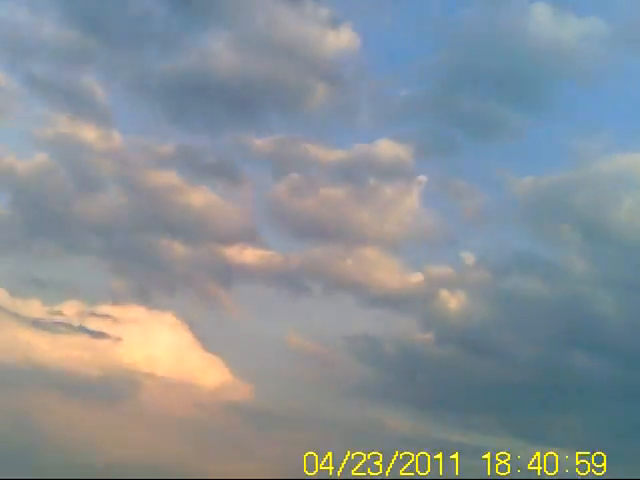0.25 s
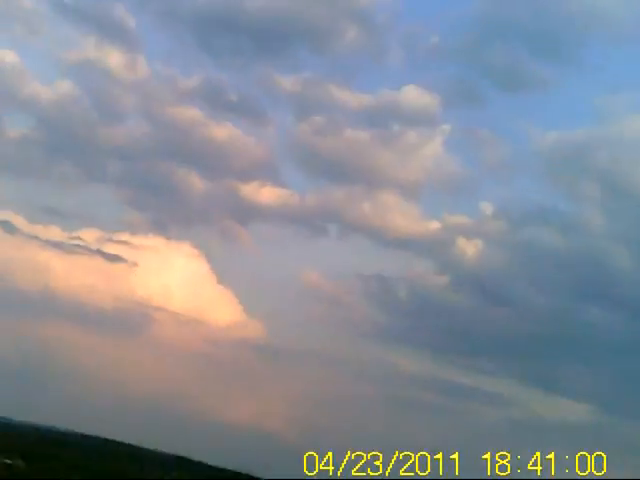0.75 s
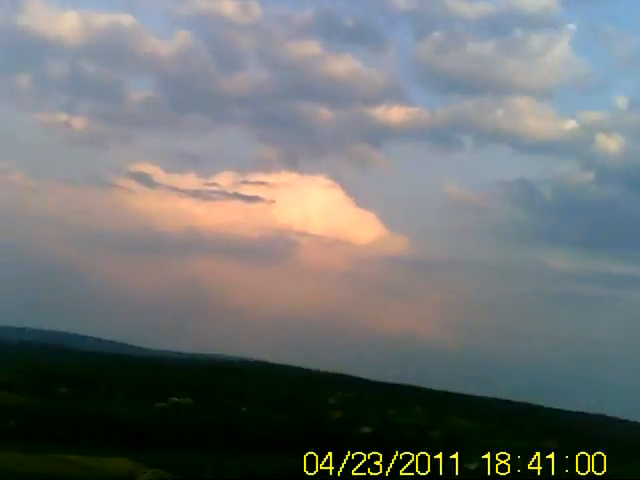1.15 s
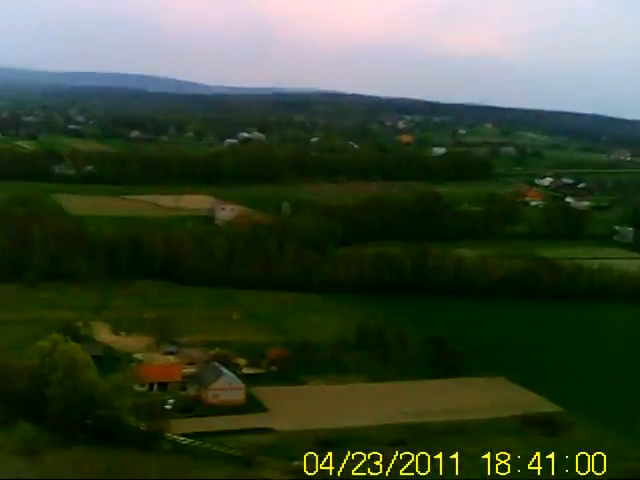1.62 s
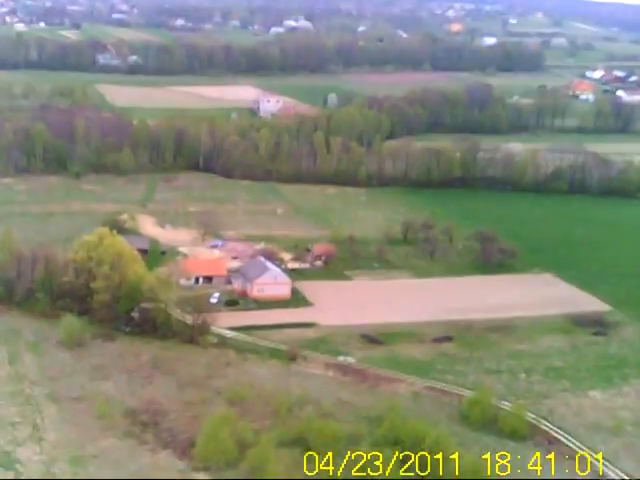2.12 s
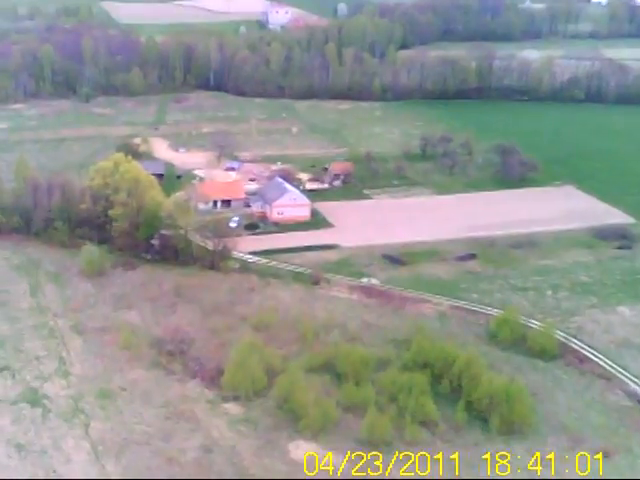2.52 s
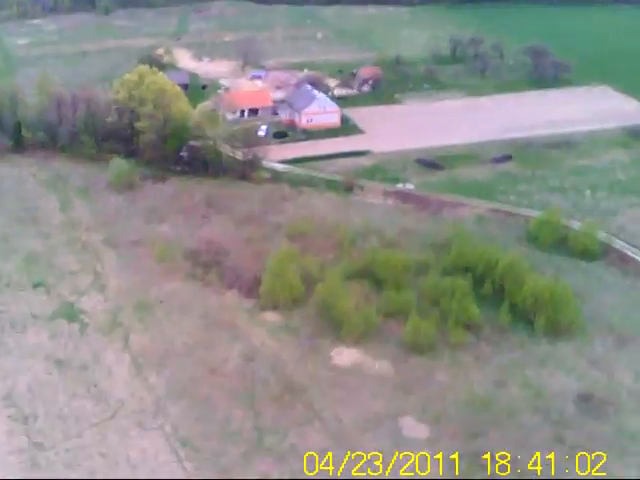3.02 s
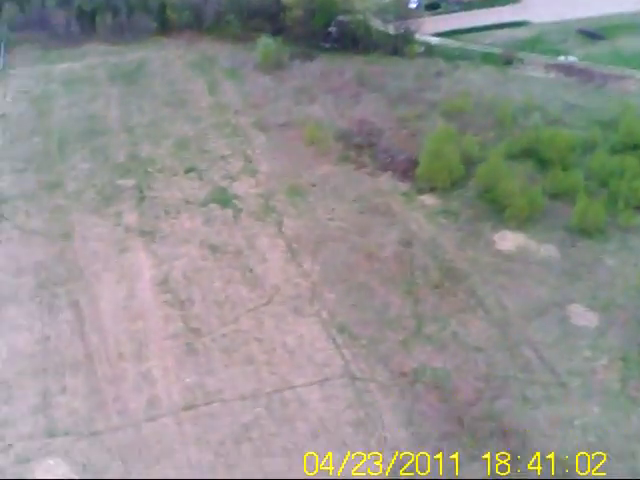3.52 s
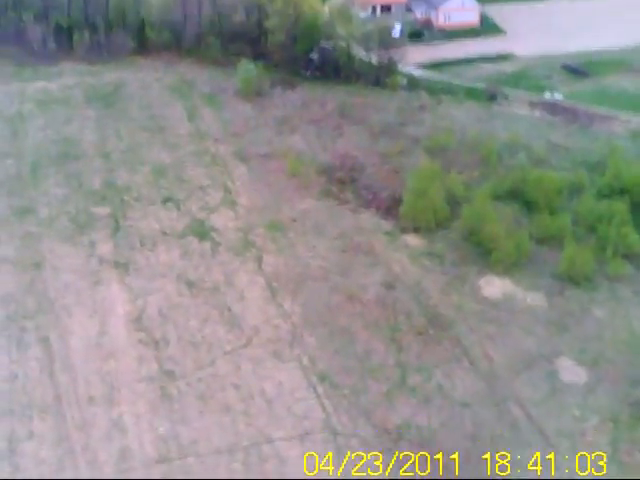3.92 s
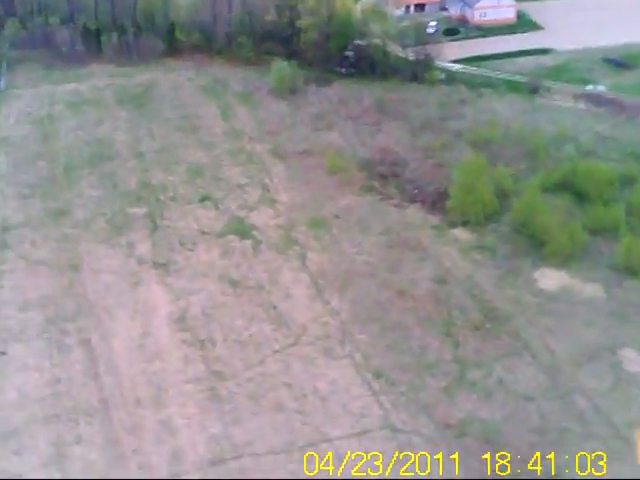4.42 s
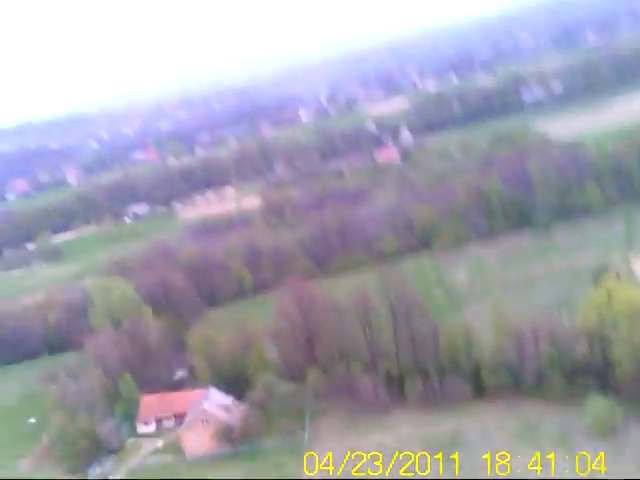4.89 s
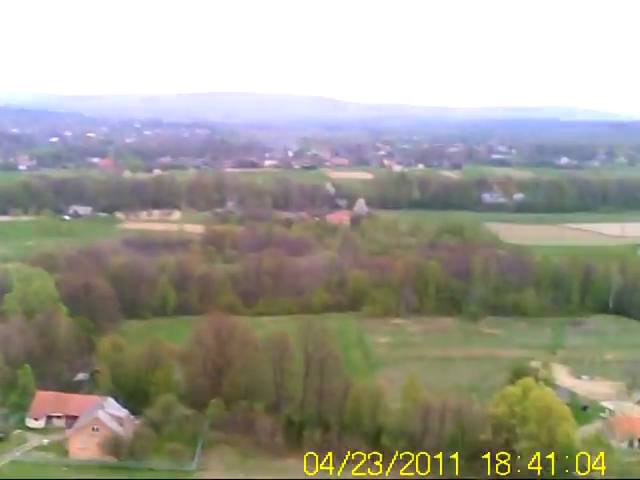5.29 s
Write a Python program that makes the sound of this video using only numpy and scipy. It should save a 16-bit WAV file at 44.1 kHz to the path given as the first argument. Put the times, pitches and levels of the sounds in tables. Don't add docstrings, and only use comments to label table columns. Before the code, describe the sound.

Open-air flight heard from a bare microphone fixed to a small electric model plane, close, dry and slightly overloaded. From 0 to 1.1 s a thin, buzzy motor whine with a fine sizzle runs beneath low wind thumps, fluttering rumble and hiss. A wavering, breathy high whistle rides on the airflow. At about 1.2 s the power is cut; the motor's tone slides downward as a rough whirr, fading out around 2 s, while a faint electronic tone beeps briefly and then lingers. Near 2.3 s the wind and whistle weaken, and tiny servo rasps tick at 2.4-2.6 s and again at 3.1 s. From 3.2 to 3.9 s strong gusts bring knocks, flutter and bright torn hiss. More buffeting follows at 4.35-4.8 s with hard jolts and a sharper whistle. Around 4.9 s the low rumble drops while hiss stays strong, then everything eases, motor still silent, to 5.5 s.

```python
import sys
import numpy as np
from scipy import signal
from scipy.fft import rfft, irfft, next_fast_len
from scipy.io import wavfile
from scipy.ndimage import uniform_filter1d

SR = 44100
rng = np.random.default_rng(int(sys.argv[2]) if len(sys.argv) > 2 else 0)


def store_wav(level_fs):
    pcm = np.round(np.clip(np.atleast_2d(level_fs), -1, 1) * 32767)
    wavfile.write(sys.argv[1], SR, pcm.T.astype(np.int16))


def convert_level_to_amplitude(level_db):
    exponent = np.asarray(level_db, float) / 20
    return 10 ** exponent


N = 244755
TIME = np.arange(N) / SR
COARSE = TIME[::64]
SIZE = next_fast_len(N)
RUN_HZ = 136

# centre_s, extra_speed_share
KICKS = [(2.02, .04), (2.125, .035), (3.362, .05), (3.38, .05), (3.45, .05), (3.668, .05), (3.69, .05),
         (3.892, .07), (4.37, .035), (4.402, .06), (4.474, .1), (4.497, .07), (4.693, .03), (4.705, -.025),
         (4.73, .03), (4.748, -.025), (4.762, .04), (5.195, .02), (5.226, .06)]


def curves(table):
    s, *columns = np.transpose(table)
    return [np.interp(TIME, s, column) for column in columns]


def after(s):
    return np.maximum(TIME - s, 0)


def swells(s, length, sizes, edge):
    distance = np.abs(COARSE - s[:, None]) / (np.abs(length[:, None]) / 2)
    shape = np.exp(-distance ** edge)
    return [np.interp(TIME, COARSE, size @ shape) for size in sizes]


def walk(rate):
    hold = int(SR / np.clip(rate, 1, 300))
    levels = np.repeat(rng.standard_normal(N // hold + 1), hold)
    return 1.3 * uniform_filter1d(uniform_filter1d(levels, hold), hold)[:N]


def band_noise(order, low_hz, high_hz):
    band = signal.butter(order, (low_hz, high_hz), "band", fs=SR, output="sos")
    return signal.sosfilt(band, rng.standard_normal(N))


def coloured(colour):
    hz, db = np.transpose(colour)
    octave = np.log2(np.maximum(np.fft.rfftfreq(SIZE, 1 / SR), 1))
    level_db = np.interp(octave, np.log2(hz), db, -200, -200)
    return rfft(rng.standard_normal(SIZE)) * convert_level_to_amplitude(level_db), octave


def turbulence(colour, shared, shared_db, own_db, rate):
    noise, octave = coloured(colour)
    lowest, highest = np.log2(colour[1][0]), np.log2(colour[-2][0])
    out = 0
    for centre in np.arange(lowest - .5, highest + 1, .5):
        window = np.cos(np.pi / 2 * np.clip(2 * (octave - centre), -1, 1)) ** 2
        out = out + irfft(window * noise, SIZE)[:N] * convert_level_to_amplitude(own_db * walk(rate))
    out = out * convert_level_to_amplitude(shared_db * shared)
    return out / out.std()


def shaft():
    ease_s, cut_s, ease_share = 1.12, 1.197, .3
    coast = ease_share * after(ease_s) + (1 - ease_share) * after(cut_s) + 1.8 * after(1.59) ** 2
    hz = 1 / (1 / RUN_HZ + .0198 * coast)
    drive_db = np.maximum(-2600 * after(1.15) ** 2, -75)
    fade_db = .5 * np.maximum(49 - hz, 0) + 3 * np.maximum(37 - hz, 0)
    cog_db = -41.8 - 13 * convert_level_to_amplitude(drive_db) - fade_db
    return hz, drive_db, cog_db


def motor():
    # shaft_multiple, level_db
    drive_partials = [(9, -59.5), (11, -50), (12, -63), (15, -53), (18, -56), (21, -56), (28, -58),
                      (29, -62), (31, -65), (32, -63), (42, -53.5), (43, -78)]
    # shaft_multiple, level_db
    cog_partials = [(11, -11), (13, 0), (25, -10), (39, -6.5)]
    # frequency_hz, gain_db
    frame_response = [(520, -30), (615, -8), (670, 2), (790, 5.5), (880, -1), (1010, -3), (1230, 4.5),
                      (1540, -6), (2150, 2), (3000, -16)]
    shaft_hz, drive_db, cog_db = shaft()
    turns = 2 * np.pi * np.cumsum(shaft_hz * (1 + .0017 * walk(14))) / SR

    def partial(k, db, rough=0):
        phase = k * turns + 7 * rng.random() + rough * walk(150)
        return np.sin(phase) * convert_level_to_amplitude(db + 1.0 + .9 * walk(25))

    frame_hz, frame_db = np.transpose(frame_response)
    cogging = 0
    for k, db in cog_partials:
        gain_db = np.interp(np.log(k * shaft_hz), np.log(frame_hz), frame_db)
        slow_db = (k > 13) * 1.6 * np.maximum(46 - shaft_hz, 0)
        cogging = cogging + partial(k, db + gain_db - slow_db, rough=abs(k - 13) / 22)
    cogging = cogging * (1 + .3 * np.cos(turns)) * convert_level_to_amplitude(.9 * walk(90))
    drive = sum(partial(k, db + drive_db * max(k - 14, 0) / 2.5) for k, db in drive_partials)
    switching = convert_level_to_amplitude(-74 + 3.5 * walk(70)) * band_noise(8, 9900, 11900)
    return convert_level_to_amplitude(drive_db) * (drive + switching) + convert_level_to_amplitude(cog_db) * cogging


def electronics():
    # pitch_hz, level_db, start_s, end_s
    tones = [
        (5416, -80, 0, 6),
        (7154, -80, 0, 6),
        (9281, -92, 0, 6),
        (7725, -68.5, 1.13, 1.29),
        (7725, -69.5, 1.47, 2.1),
        (11073, -90, 0, 1.17),
    ]
    out = 0
    for hz, db, start, end in tones:
        gate = np.clip(np.minimum(TIME - start, end - TIME) / .025, 0, 1)
        out = out + convert_level_to_amplitude(db + 2.5) * np.sin(2 * np.pi * hz * TIME) * gate
    return out


def eddies():
    # time_s, level_db
    shaking = [(0.0, -25), (.9, -27), (1.25, -25.5), (1.33, -28), (1.55, -29), (1.87, -27), (2.35, -33),
               (2.6, -29.5), (3.15, -29), (3.26, -29.5), (3.36, -27), (3.9, -26), (3.96, -28), (4.75, -28),
               (4.82, -36.5), (4.96, -36.5), (5.07, -30), (5.55, -31.5)]
    # centre_s, length_s, level_db, fineness (0 thump, 1 flutter, 2 rumble)
    passing_eddies = [(0.0, .08, -17.5, -8), (0.359, 0.093, -21.5, -0.5), (0.566, 0.039, -22.5, 0.2),
                      (0.88, 0.059, -42.5, -3.5), (1.145, 0.024, -25, 0.8), (1.21, 0.14, -31.5, 0.5),
                      (1.391, 0.046, -21, -0.5), (1.916, 0.19, -20, -0.18), (2.186, 0.16, -23, -0.76),
                      (2.575, 0.074, -25, 1.5), (2.773, 0.9, -29, 0.7), (3.062, 0.097, -31.5, 1),
                      (3.168, 0.11, -31, 1.5), (3.32, 0.065, -27.5, 1.5), (3.422, 0.045, -20, 0),
                      (3.477, 0.16, -22, 0.5), (3.403, 0.04, -29.5, 1.5), (3.679, 0.021, -9, 1.5),
                      (3.777, 0.015, -33.5, -3.5), (3.879, 0.049, -23, 1.5), (3.715, 0.08, -26, 0.5),
                      (3.815, 0.16, -21, 0.77), (4.339, .06, -13, -1.5), (4.377, 0.15, -24, 0.8),
                      (4.497, 0.081, -19.5, 0.1), (4.688, 0.041, -29, -4), (4.623, 0.021, -32.5, 1.5),
                      (4.733, 0.014, -29.5, 2.5), (4.766, 0.02, -27, 1), (5.051, 0.17, -50, 4),
                      (5.225, 0.19, -26.5, 0.5)]
    bed_levels = (-2.5, 0, 0.62, -12.5)
    bed_growth = (0.99, 0.91, 0.93, 1.13)
    bed_db = curves(shaking)[0] + 30
    beds = [base - 30 + growth * bed_db for base, growth in zip(bed_levels, bed_growth)]
    beds[3] = beds[3] + 0.9 * airstream()[4]
    s, length, db, fineness = np.transpose(passing_eddies)
    sizes = [convert_level_to_amplitude(db - 22 * (fineness - k) ** 2) for k in range(4)]
    passing = swells(s, length, sizes, 2)
    return [20 * np.log10(convert_level_to_amplitude(bed) + p) for bed, p in zip(beds, passing)]


def trains():
    # centre_s, length_s, pitch_hz, level_db
    runs = [
        (0.26, 0.053, 86.5, -15),
        (0.492, 0.1, 91.4, -14),
        (3.318, 0.049, 92.4, -14.5),
        (3.371, 0.065, 93.7, -14.5),
        (3.474, 0.046, 82.4, -13.5),
        (3.535, .09, 94.3, -17),
        (4.387, 0.093, 77.2, -14.5),
        (4.49, 0.071, 83.9, -15),
        (5.03, 0.058, 161, -26.5),
        (4.965, 0.056, 167, -29),
    ]
    out = 0
    for s, length, hz, db in runs:
        envelope = np.exp(-((TIME - s) / (length / 2)) ** 2)
        out = out + convert_level_to_amplitude(db) * np.cos(2 * np.pi * hz * (TIME - s)) * envelope
    return out


def lurches():
    # centre_s, pressure, width_s
    pushes = [(0.0, 0.17, 0.014), (0.576, 0.6, 0.0025), (0.873, 0.25, 0.00072), (1.025, 0.44, 0.0032),
              (1.072, 0.38, 0.0031), (1.371, 0.2, 0.012), (1.413, -0.082, 0.0036), (2.04, -0.29, 0.017),
              (3.184, 0.33, 0.0015), (3.19, 0.14, 0.021), (3.2088, -0.75, 0.00069), (3.277, 0.26, 0.0032),
              (3.445, 0.11, 0.005), (3.561, -0.19, 0.018), (3.66, 0.34, .014), (3.688, 0.62, 0.0028),
              (3.782, .28, 0.011), (3.826, -.15, 0.0084), (3.89, 0.55, 0.0018), (4.354, 0.21, 0.0038),
              (4.52, -0.19, 0.026), (4.67, 0.41, 0.0014), (4.688, 0.27, 0.0053), (4.73, 0.25, 0.0027),
              (4.754, 0.4, 0.0017), (5.185, -0.21, 0.012)]
    # start_s, pressure, recovery_s
    drops = [
        (3.207, 0.24, 0.015),
        (3.69, 0.23, 0.022),
        (3.895, 0.52, 0.027),
        (4.695, .3, 0.0052),
        (4.775, 0.49, 0.079),
    ]
    push = sum(size * np.exp(-.5 * ((TIME - s) / width) ** 2) for s, size, width in pushes)
    drop = sum(size * np.exp(-after(s) / back) * np.tanh(after(s) / 0.00098) for s, size, back in drops)
    leaked = signal.sosfilt(signal.butter(1, 2.9, "high", fs=SR, output="sos"), push - drop)
    return signal.sosfiltfilt(signal.butter(4, 800, fs=SR, output="sos"), leaked)


def buffeting(flutter, gust):
    # frequency_hz, level_db
    thump_colour = [(2.9, -43), (5.0, -2.5), (16, -3), (38, 0), (55, -10), (72, -39), (120, -120)]
    rumble_colour = [(71, -13), (120, 1.5), (340, -8.5), (440, -61), (750, -120)]
    rush_colour = [(200, -32), (340, -1), (624, -12.5), (771, -18.5), (900, -28), (1170, -54), (1980, -120)]
    thump_db, flutter_db, rumble_db, rush_db = eddies()
    swell = walk(15)
    thump = turbulence(thump_colour, swell, shared_db=2.5, own_db=1.8, rate=5.3)
    rumble = turbulence(rumble_colour, swell, shared_db=0.53, own_db=2.0, rate=16)
    rush = turbulence(rush_colour, swell + gust, shared_db=0.14, own_db=1.56, rate=18)
    out = convert_level_to_amplitude(thump_db + 0.5) * thump + convert_level_to_amplitude(flutter_db - 0.3) * flutter
    out = out + convert_level_to_amplitude(rumble_db - 0.1) * rumble + convert_level_to_amplitude(rush_db + 1.0) * rush
    return out + lurches() + trains()


def airstream():
    # time_s, shedding_hz, hiss_db, tone_lock_db
    air = [(0.0, 2440, -40, -52.5), (1.05, 2380, -39.5, -53.5), (1.34, 2311, -42, -53),
           (1.64, 2040, -41, -58.5), (2.08, 1980, -45, -53.5), (2.29, 1800, -49, -77),
           (2.5, 1840, -47, -71.5), (2.58, 1900, -44.5, -51.5), (2.82, 1879, -46, -57.5),
           (2.97, 1830, -46, -87), (3.33, 2020, -43.5, -51), (3.95, 1990, -44, -52), (4.25, 1990, -46, -54),
           (4.63, 2100, -43.5, -54), (4.9, 2110, -46, -55), (5.24, 2090, -45.5, -56.5),
           (5.38, 1835, -47.5, -67), (5.55, 1800, -49.5, -77)]
    # centre_s, length_s, extra_speed_share, extra_hiss_db, upper_tone_push_db
    gusts = [(0.02, .1, 0.065, 1, 0), (0.297, 0.038, 0.017, -1, -2), (0.485, 0.078, 0.039, 1.4, 0),
             (0.588, 0.038, 0.023, 1.5, 1), (0.676, 0.068, -0.015, -0.2, -1), (0.833, .09, -0.028, -0.5, 1),
             (1.008, 0.09, -0.02, -1.2, 3), (1.237, 0.14, 0.051, 0.5, 6), (1.379, 0.046, 0.065, 3.5, 7),
             (1.434, .06, 0.021, 1, 5), (1.596, .07, .04, 0, -3), (1.487, 0.19, 0.027, 3, 1),
             (1.64, 0.069, -0.009, -2.5, 8), (1.835, 0.19, 0.039, -1.5, 4.5), (2.004, 0.058, 0.075, 2, 1),
             (2.431, 0.097, 0.046, -0.5, 4.5), (2.185, 0.034, 0.035, -1, 5.5), (2.866, 0.076, .01, -1, 3.5),
             (3.074, 0.061, 0.002, 1.5, 5), (3.183, 0.049, 0.042, 4, 1), (3.253, 0.069, -0.032, -0.5, -4),
             (3.516, 0.17, 0.082, 4.5, 2), (3.639, 0.053, .04, 2, -8), (3.675, 0.053, .095, 5, 11.5),
             (3.707, 0.043, -.035, 3, 3), (3.746, .05, 0.037, 2.5, 1), (3.807, 0.075, 0.14, 5, 12),
             (3.876, .06, 0.11, 5.5, 8), (3.925, .04, -0.00067, 2, 0), (4.359, 0.045, 0.057, 0.2, 5),
             (4.425, 0.053, 0.039, 0, 4), (4.487, 0.038, 0.047, 2, 5.5), (4.608, 0.07, 0.02, -1, 2),
             (4.683, .055, 0.15, 3, 10.5), (4.745, .08, 0.16, 5, 10.5), (4.81, 0.077, 0.076, 6.5, 15),
             (4.862, 0.048, 0.0, 6.5, 11), (4.938, 0.1, -0.015, 3.5, 9.5), (5.087, 0.27, 0.075, 5, 12),
             (5.283, 0.086, 0.0017, 0.5, 4)]
    hz, hiss_db, lock_db = curves(air)
    s, length, *sizes = np.transpose(gusts)
    extra, gust_db, push_db = swells(s, length, sizes, 4)
    return hz * (1 + extra), hiss_db + gust_db, lock_db, push_db, gust_db


def sizzle():
    hiss_db = airstream()[1]
    s, share = np.transpose(KICKS)
    kick = swells(s, 0.018 + 0 * s, [share], 1.3)[0]
    wash_db = 9.5 * (shaft()[0] / RUN_HZ) ** 3.0
    return hiss_db, -78.5 + 1.58 * (hiss_db + 44) + wash_db + 45 * kick


def wind(gust):
    # frequency_hz, level_db
    hiss_colour = [(500, -14), (850, -4.5), (1490, -6.5), (1770, -5), (3300, -10.5), (3640, -10.5),
                   (4080, -20.5), (5200, -30), (6760, -63.5), (11400, -120)]
    fine_colour = [(3500, -24.5), (5200, -8.5), (5950, -5.5), (6750, -13), (7400, -14.5), (8350, -12),
                   (9400, -24.5), (9750, -33), (10600, -42), (11500, -86)]
    hiss_db, fine_db = sizzle()
    _, _, _, push_db, gust_db = airstream()
    tatter_db = .35 * np.maximum(gust_db, 0) * walk(70)
    hiss = turbulence(hiss_colour, gust, shared_db=0.07, own_db=1.1, rate=28)
    hiss = hiss * convert_level_to_amplitude(hiss_db + tatter_db - 2.2)
    torn_db = hiss_db - 8.5 + 0.48 * gust_db + 0.58 * push_db + tatter_db
    torn = convert_level_to_amplitude(torn_db) * band_noise(3, 2300, 3900)
    fine = turbulence(fine_colour, gust, shared_db=0.3, own_db=0.0, rate=63)
    return hiss + torn + convert_level_to_amplitude(fine_db + 12.0) * fine


def stages():
    hz, _, lock_db, push_db, gust_db = airstream()
    weakness = np.clip((-56.5 - lock_db) / 12, 0, 1)
    lock_db = lock_db + 2.6 * np.maximum(gust_db + push_db, 0) * weakness
    lock, speed = lock_db + 53, np.log2(hz / 2050)
    first_db = -51.5 + 0.7 * lock + 20 * speed + 0.29 * gust_db
    third_db = -72 + 0.6 * lock + 19 * speed + push_db + 2.7 * convert_level_to_amplitude(shaft()[1])
    return hz, first_db, lock_db + 0.12 * gust_db, third_db


def edge_tone(flutter):
    hz, first_db, second_db, third_db = stages()
    wash = convert_level_to_amplitude(shaft()[1])
    wake = .3 * convert_level_to_amplitude(.7 * (eddies()[1] + 27)) * flutter + 6 * trains()
    swing = (.055 - .035 * wash) * np.tanh(wake)
    kick = sum(share * np.exp(-((TIME - s) / .0045) ** 2) for s, share in KICKS)
    stir = uniform_filter1d(abs(swing), 900)
    spikes = (.002 + .005 * wash + .3 * stir) * (np.clip(walk(130), 0, 1.9) ** 2 - .4)
    jitter = (.0015 + .003 * wash) * walk(20) + (.008 + .009 * wash) * walk(300)
    shake = swing + kick + spikes + jitter
    choke_db = np.minimum((2.6 + 3.2 * wash + 130 * stir) * walk(220), 3)
    turns = 2 * np.pi * np.cumsum(hz * (1 + shake)) / SR
    smear = 1.05 + .1 * np.maximum(airstream()[4], 0)
    steady_hz = uniform_filter1d(hz, 3000) * (.99 + .3 * shake)
    steadier = 2 * np.pi * np.cumsum(steady_hz) / SR + (1.5 * smear - .4 + .3 * wash) * walk(300)
    first = np.sin(steadier) * convert_level_to_amplitude(first_db + 2.9 * walk(280) + 2.5)
    second = np.sin(2 * turns + (smear - .65 + .65 * wash) * walk(300))
    second = second * convert_level_to_amplitude(second_db + choke_db + 4.0 - 0.79 * wash)
    flare_db = 55 * shake + 60 * kick + np.minimum(4.5 * walk(150), 2.5)
    stage_db = third_db + .8 * np.minimum(third_db + 66, 0)
    third = np.sin(3 * turns + .55 * walk(300))
    fourth = convert_level_to_amplitude(-14.5 - np.maximum(hz - 2300, 0) / 9) * np.sin(4 * turns + 1.5 * walk(300))
    return first + second + (third + fourth) * convert_level_to_amplitude(stage_db + flare_db + 3.0)


def servo():
    # centre_s, length_s, level_db
    moves = [
        (2.444, 0.038, -61),
        (2.41, 0.037, -70),
        (2.495, 0.018, -66),
        (2.53, 0.045, -59.5),
        (2.605, .015, -67),
        (3.095, .04, -64),
    ]
    envelope = sum(convert_level_to_amplitude(db + 7.5) * np.exp(-((TIME - s) / (length / 2)) ** 4) for s, length, db in moves)
    return band_noise(6, 5200, 8500) * envelope


def scene():
    # frequency_hz, level_db
    flutter_colour = [(32, -31), (55, 3), (86, 4.5), (125, -13.5), (160, -33), (280, -120)]
    flutter = turbulence(flutter_colour, walk(13), shared_db=-0.5, own_db=4.0, rate=4.5)
    gust = walk(26)
    air = buffeting(flutter, gust) + wind(gust) + edge_tone(flutter)
    return (air + motor() + servo() + electronics())[None]


def band_limit(x):
    return signal.sosfilt(signal.butter(12, 12100, fs=SR, output="sos"), x)


def record(dry):
    lowpass = signal.ellip(6, .5, 50, 9300, fs=SR, output="sos")
    own_noise = convert_level_to_amplitude(-72.0) * signal.sosfilt(lowpass, rng.standard_normal(dry.shape))
    rounded = .72 * np.tanh(dry / .72)
    return band_limit(rounded + own_noise - .0153)


dry = scene()
out = record(dry)
store_wav(out)
```